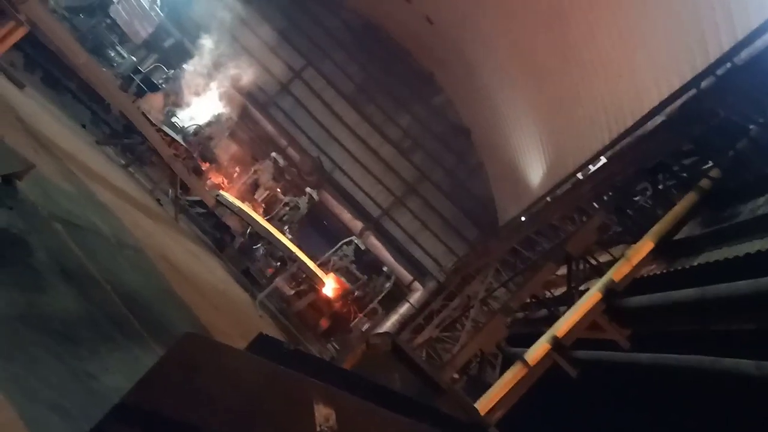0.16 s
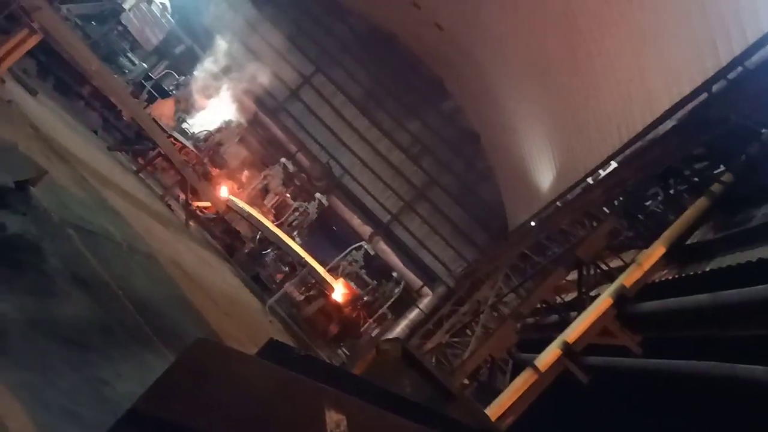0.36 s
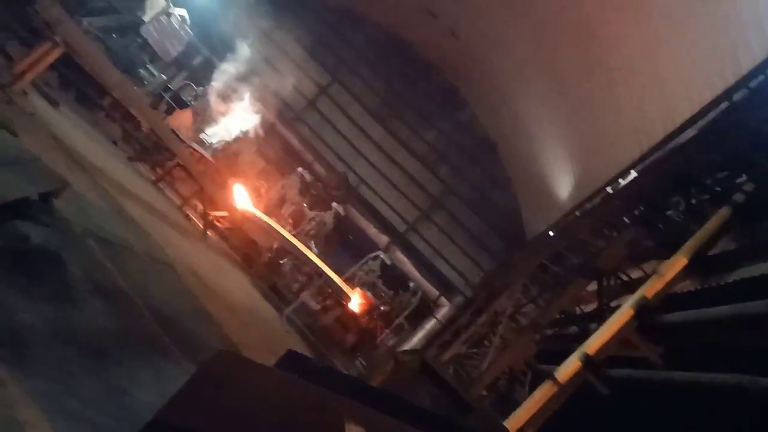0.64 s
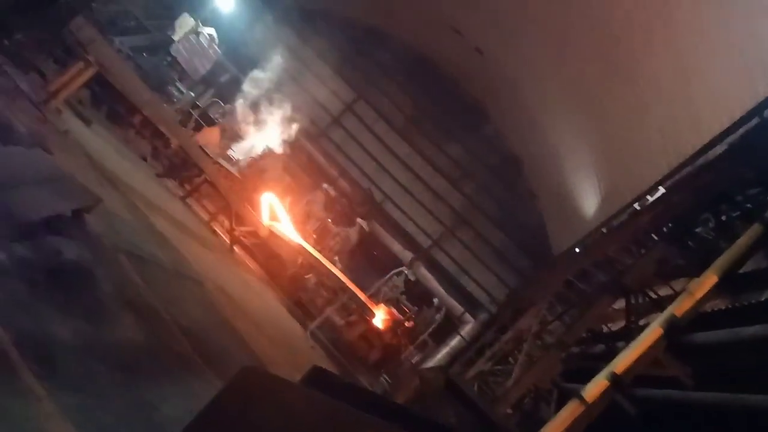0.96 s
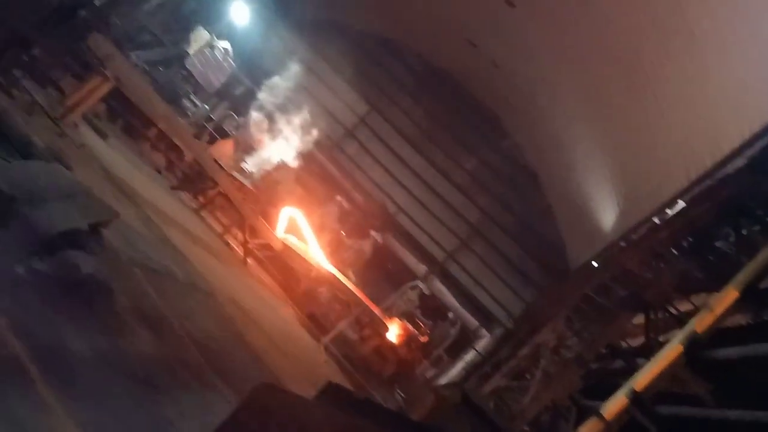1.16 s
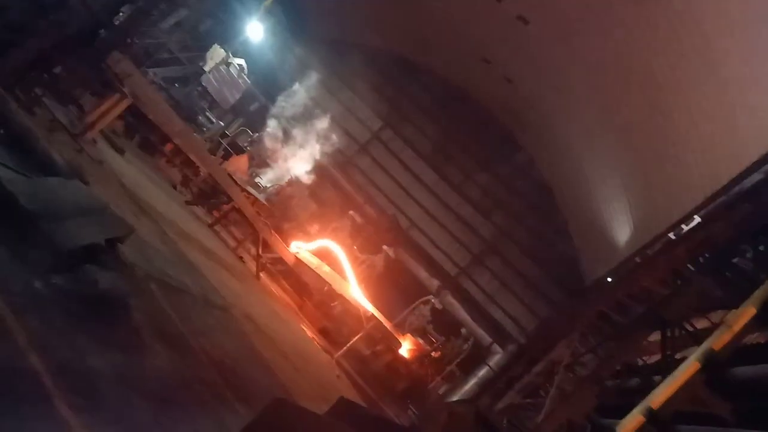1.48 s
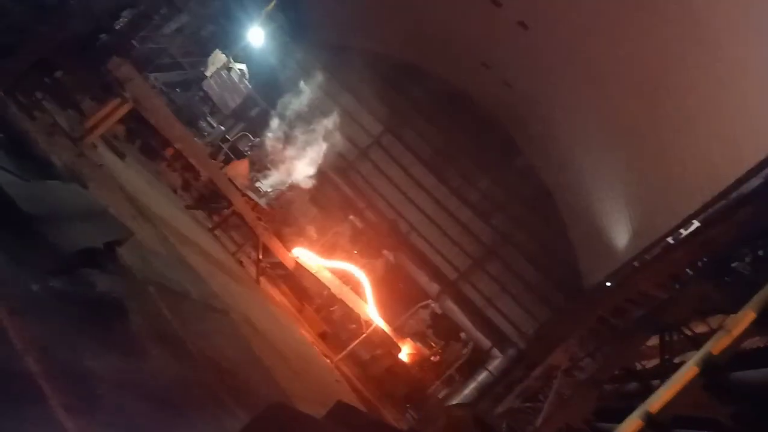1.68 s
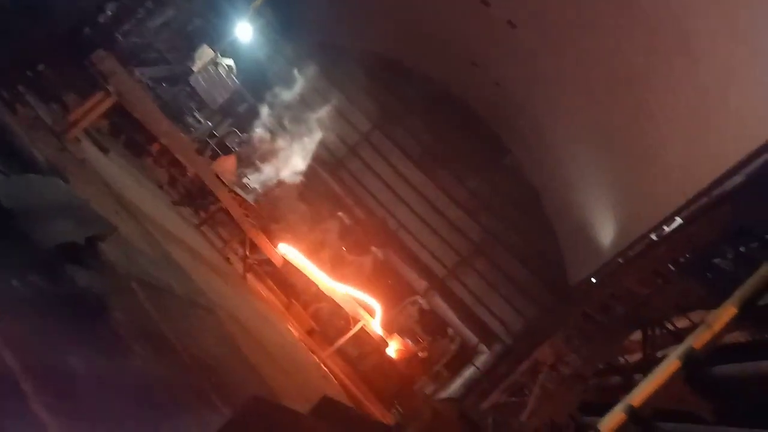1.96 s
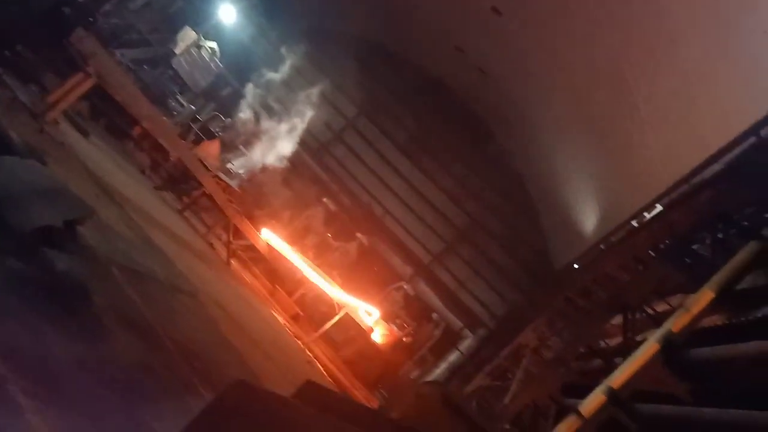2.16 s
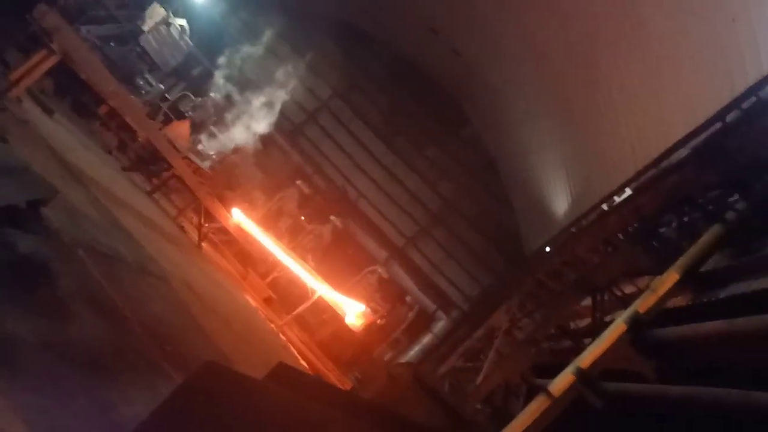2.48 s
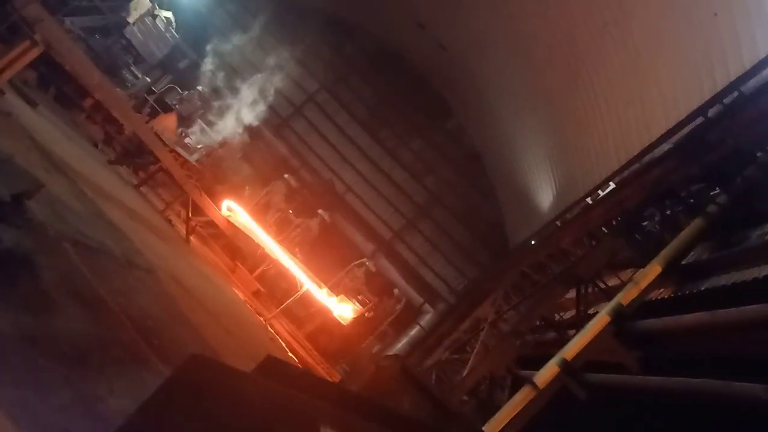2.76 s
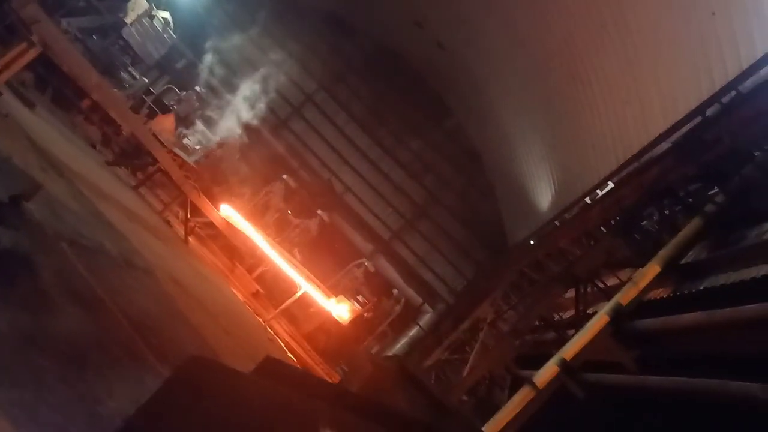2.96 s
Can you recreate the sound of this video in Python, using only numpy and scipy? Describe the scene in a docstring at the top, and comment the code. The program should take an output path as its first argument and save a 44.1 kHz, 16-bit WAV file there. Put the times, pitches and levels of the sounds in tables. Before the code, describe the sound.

Loud low roar of a running rolling mill, muffled metal clanks, brief chirps, echoing hall

```python
"""A large hall with a steel rolling mill: stands, fans and cooling water roar as shaped, diffuse noise.
Gear and motor tones waver in it as drifting sines; a bearing squeals as narrow bands of noise.
A roller chirps in short blips. The bar strikes its guide, a noise-rung bank of modes with a crash,
scrapes it with uneven noise, and makes the stand thud through lower modes.
Two microphone ports hear each clank mostly as hall sound, a decaying diffuse echo."""
import sys
import numpy as np
from scipy import signal
from scipy.fft import rfft, irfft
from scipy.io import wavfile
from scipy.ndimage import uniform_filter1d

SR = 44100
rng = np.random.default_rng(int(sys.argv[2]) if len(sys.argv) > 2 else 0)


def persist_wave(psi):
    """Save psi, clipped to +-1, as 16-bit WAV."""
    counts = np.round(np.clip(psi, -1, 1) * 32767).astype(np.int16)
    wavfile.write(sys.argv[1], SR, np.atleast_2d(counts).T)


def ratio_of_db(decibels):
    """Turn decibels (scalar or array-like) into linear amplitude factors; 0 dB maps to 1."""
    return 10 ** (np.asarray(decibels, float) / 20)


N = 138033

# Likeness of the sound at the two ports. Each row: frequency in Hz, left-right correlation.
PORT_LIKENESS = [(60, 0.88), (120, 1), (230, 0.73), (440, 0.73), (860, 0.085), (1660, 0.035),
                 (3240, -0.083), (6290, -0.00072)]


def roar():
    """Broadband noise: many independent sources add to a diffuse field that follows the mill's load."""
    # Spectrum of the mill line. Each row: frequency in Hz, relative density in dB per Hz.
    roar_spectrum = [(30, -35.5), (65, -33), (100, -11), (200, -11), (290, -6.5), (350, -5), (450, -7),
                     (560, -7.5), (760, -8), (900, -11), (1080, -15), (1400, -20), (2350, -19.5),
                     (3000, -24), (4120, -32.5), (6100, -35), (6700, -43.5), (7400, -54), (9500, -63),
                     (11000, -66.5), (13500, -65), (15000, -68.5)]
    # Load on the stands. Each row: time in seconds, level change at full share in dB.
    stand_load = [(0, 0), (.2, 0.5), (.45, 0), (.8, 0.5), (1.1, -1.5), (1.4, 0.5), (1.7, 0.5), (2., 0.),
                  (2.3, 4), (2.55, 0.5), (2.8, -0.5), (3.13, -1)]
    # How far each band follows the load. Each row: frequency in Hz, share from 0 to 1.
    load_share = [(100, 0.17), (500, 0.99), (3000, 0.72)]
    roar_db, patch_db = -22.5, 0.7  # rms of the ports' mean; rms of the faint drifting patches

    def level_db(t, hz):
        patches = rng.standard_normal((len(t), len(hz))).T
        patches = uniform_filter1d(patches, size=10, axis=0)  # smooth over frequency
        patches = evened(uniform_filter1d(patches, size=14, axis=1))  # smooth over time
        load_db = np.interp(t, *np.transpose(stand_load)) * read(load_share, hz)
        return read(roar_spectrum, hz) + load_db + patch_db * patches

    noise = diffuse(N, level_db, order=1024)
    return ratio_of_db(roar_db) * noise / np.sqrt(np.mean(noise.mean(0) ** 2))


def gears():
    """Periodic forcing gives tones; slow frequency modulation and beats differ in part at each port."""
    # Gear and motor tones. Each row: frequency in Hz, level in dB at four evenly spaced times from
    # start to end, rms frequency waver in Hz.
    gear_tones = [(323, -29, -30, -30, -33, 1.), (398, -40, -36, -33, -34, 2.),
                  (435, -38, -37, -37, -34, 2.5), (641, -32, -38, -43, -47, 2.5),
                  (715, -38, -39, -36, -37, 3.), (861, -41, -45, -34, -39, 3.),
                  (971, -44, -46, -45, -47, 6.), (1141, -45, -45, -46, -47, 3.),
                  (1185, -50, -50, -47, -49, 4.), (1691, -50, -51, -52, -52, 5.),
                  (4572, -58, -58, -60, -64, 3.)]
    beat_rms_db, slip_turns = 2.6, 0.12
    t = np.arange(N) / SR
    slow = t[::256]
    out = np.zeros((2, N))
    for hz, *tone_db, waver_hz in gear_tones:
        waver = np.interp(t, slow, wander(slow, 0.5, 12.0))
        turns = np.cumsum(hz + waver_hz * waver) / SR
        unlikeness = np.sqrt(1 - np.clip(read(PORT_LIKENESS, hz), 0, 1))
        course_db = np.interp(t, np.linspace(0, t[-1], len(tone_db)), tone_db)
        for port in out:
            beat_db = beat_rms_db * np.interp(t, slow, wander(slow, 2.5, 24.0))
            slip = slip_turns * unlikeness * np.interp(t, slow, wander(slow, 0.6, 4.0))
            sine = np.sqrt(2) * np.sin(2 * np.pi * (turns + slip))
            port += ratio_of_db(course_db + beat_db) * sine
    return out


def clank(ring_db, bright_hz, crack_db):
    """Impact: bouncing contact excites the guide's modes and a broad crash near the brightest pitch."""
    # Modes of the steel guides. Each row: frequency in Hz, relative level in dB, t60 in seconds.
    guide_modes = [(1460, -8.5, 0.097), (1930, 12, 0.012), (2005, 10, 0.087), (2320, 8, 0.018),
                   (2470, 1.5, 0.03), (2790, 6, 0.034), (2960, 4.5, 0.043), (3900, 10.5, 0.044),
                   (5100, -2.5, .02), (5730, -3.5, 0.018)]
    hit = rattle(0.0096)
    ring = rung(guide_modes, bright_hz, 0.21, hit)
    return ratio_of_db(ring_db) * (ring + ratio_of_db(crack_db) * crashed(hit, bright_hz))


def thud(db, bright_hz):
    """Structural resonance: a longer rattle excites the low modes of the stand."""
    # Modes of the stand. Each row: frequency in Hz, relative level in dB, t60 in seconds.
    stand_modes = [(338.5, 7, 0.2), (405.5, -9, 0.23), (477.7, -1.5, 0.21), (492, -15.5, 0.58),
                   (577, -2.5, 0.047), (655, 0., 0.16), (720, -9.5, 0.13), (806, -4, .25), (1010, 6, 0.078)]
    return ratio_of_db(db) * rung(stand_modes, bright_hz, 0.38, rattle(0.028))


def rattle(decay_s):
    """Bouncing contact as noise force with an exponential decay; decay_s is its time constant."""
    t = np.arange(SR // 3) / SR
    return rng.standard_normal(len(t)) * np.exp(-t / decay_s)


def rung(modes, bright_hz, width_oct, force):
    """Modal superposition: decaying sines convolved with the force, strongest near bright_hz."""
    focus_peak_db = 15
    t = np.arange(len(force)) / SR
    hz, mode_db, t60 = np.transpose(modes)[:, :, None]
    focus_db = focus_peak_db * np.exp(-(np.log2(hz / bright_hz) / width_oct) ** 2)
    decay = ratio_of_db(mode_db + focus_db - 60 * t / t60)
    impulse_response = (decay * np.sin(2 * np.pi * hz * t)).sum(0)
    return evened(signal.fftconvolve(impulse_response, force)[:len(t)])


def crashed(x, bright_hz):
    """Spectral shaping: noise takes the colour of steel on steel, with a hump at bright_hz."""
    # Spectrum of steel on steel. Each row: frequency in Hz, relative level in dB.
    crack_spectrum = [(200, -35), (700, 4), (1200, -2), (1800, -2.5), (2800, 0), (4000, -7.5), (6300, -7),
                      (7500, -41.5), (15000, -53.5)]
    hump_peak_db, hump_oct = 12, 1
    hz = np.fft.rfftfreq(len(x), 1 / SR)
    hump_db = hump_peak_db * np.exp(-(np.log2((hz + 1) / bright_hz) / hump_oct) ** 2)
    return evened(irfft(rfft(x) * ratio_of_db(read(crack_spectrum, hz) + hump_db), len(x)))


def scrape():
    """Friction noise: the bar drags on the guide as dense uneven grit under one level course."""
    # Course of the scrape. Each row: time in seconds, level in dB.
    scrape_course = [(2.158, -60), (2.17, -39), (2.21, -38.5), (2.27, -32.5), (2.342, -25), (2.4, -35),
                     (2.5, -36), (2.62, -45)]
    grit_db, bright_hz = 4, 2600  # mean of the random gain steps, each 128 samples long
    t = np.arange(N) / SR
    s, course_db = np.transpose(scrape_course)
    steps = np.repeat(rng.exponential(1, N // 128 + 1), 128)[:N]
    grit = rng.standard_normal((2, N)) * ratio_of_db(grit_db * steps)
    swell = ratio_of_db(np.interp(t, s, course_db, left=-99, right=-99))
    return swell * np.array([crashed(port, bright_hz) for port in grit])


def squeak(peak_db, hz):
    """Short tone burst: a roller chirps as a sine whose envelope rises and decays in milliseconds."""
    rise_s = 0.005
    u = np.arange(SR // 3) / SR / rise_s
    envelope = u * np.exp(1 - u)
    return ratio_of_db(peak_db) * envelope * np.sin(2 * np.pi * hz * rise_s * u)


def squeal():
    """Narrowband noise: a dry bearing swells in short bursts over a steadier, fainter lower band."""
    # Bursts of the bearing. Each row: middle in seconds, length in seconds, level in dB.
    bearing_bursts = [(.17, .15, -61.5), (0.366, 0.11, -64.5), (.77, 0.11, -62.5), (.99, 0.065, -67),
                      (1.37, 0.12, -65), (1.613, 0.2, -66), (2.005, 0.14, -60), (2.225, 0.14, -64),
                      (2.64, 0.11, -69), (2.838, 0.15, -70)]
    rest_db, lower_db = -79.5, -72.5
    t = np.arange(N) / SR
    middle, length, burst_db = np.transpose(bearing_bursts)[:, :, None]
    bursts = ratio_of_db(burst_db) * np.exp(-((t - middle) / length * 2) ** 4)
    swell = ratio_of_db(rest_db) + bursts.sum(0)
    return swell * whistle(8700) + ratio_of_db(lower_db) * whistle(7860)


def whistle(hz):
    """Bandpass noise: a Gaussian band around hz, uncorrelated at the two ports."""
    width_hz = 78  # from the centre to 1/e in amplitude
    off = (np.fft.rfftfreq(N, 1 / SR) - hz) / width_hz
    return evened(irfft(rfft(rng.standard_normal((2, N))) * np.exp(-off ** 2), N))


def played(rows, source):
    """Superposition: events add on one track, bandpassed to leave out deep bass and dull by distance."""
    band_hz = [204, 6750]
    track = np.zeros(N + SR)
    for s, *row in rows:
        track[round(s * SR):][:SR // 3] += source(*row)
    band = signal.butter(4, band_hz, "band", fs=SR, output="sos")
    return signal.sosfilt(band, track[:N])


def hall():
    """Reverberation: a diffuse impulse response builds up, then each band decays at its own rate."""
    # Decay of the hall. Each row: frequency in Hz, t60 in seconds.
    hall_decay = [(200, .8), (1000, .6), (3000, .5), (7000, .35)]
    build_s = 0.003
    tail = diffuse(SR, lambda t, hz: -60 * t / read(hall_decay, hz), order=256)
    tail = tail * np.minimum(np.arange(SR) / SR / build_s, 1)
    return tail / np.sqrt((tail ** 2).sum(1).mean())


def diffuse(size, level_db, order):
    """Diffuse field: two-port noise with set coherence; level_db(t, hz) shapes its short-time spectra."""
    # Balance of the ports. Each row: frequency in Hz, left minus right in dB.
    port_lean = [(60, -0.5), (120, 1.5), (230, -2), (440, -0.5), (860, -2.5), (1660, -1), (3240, 1.0),
                 (6290, 0)]
    frames = size * 4 // order + 5
    hz = np.fft.rfftfreq(order, 1 / SR)[:, None]
    a, b, c, d = rng.standard_normal((frames, len(hz), 4)).T
    same = np.clip(read(PORT_LIKENESS, hz), -1, 1)
    left = a + 1j * b
    right = same * left + np.sqrt(1 - same ** 2) * (c + 1j * d)
    lean_db = np.array([0.5, -0.5])[:, None, None] * read(port_lean, hz)
    t = np.arange(frames) * order / 4 / SR
    spectra = np.array([left, right]) * ratio_of_db(level_db(t, hz) + lean_db)
    return signal.istft(spectra, nperseg=order, noverlap=order * 3 // 4)[1][:, :size]


def wander(t, lo_hz, hi_hz):
    """Random modulation: slow sines of random phase, weaker as they get faster, add to unit rms."""
    rates = np.geomspace(lo_hz, hi_hz, 16)
    return evened(sum(np.sin(2 * np.pi * (f * t + rng.random())) / np.sqrt(f) for f in rates))


def evened(x):
    """Energy normalisation: scales the whole signal to unit rms."""
    return x / np.sqrt(np.mean(x ** 2) + 1e-20)


def read(points, hz):
    """Spectral interpolation: reads a curve along a logarithmic frequency axis."""
    f, value = np.transpose(points)
    return np.interp(np.log(hz + 1), np.log(f + 1), value)


def scene():
    """Direct and reverberant fields add; events share three spots, each with its own echo pattern."""
    # Bar on guide. Each row: start in seconds, ring level in dB, brightest frequency in Hz,
    # crack level against the ring in dB.
    clank_events = [(.195, -46, 1800, -2), (.2876, -41, 2000, 9), (.3094, -49, 1810, 12),
                    (.345, -53, 2400, 5.5), (.465, -53, 3900, 6.5), (.4993, -46, 2320, 6.5),
                    (.5969, -47, 2050, -1), (.7394, -51, 2800, 10.5), (.925, -52, 3370, 5),
                    (1.2071, -49, 2100, 8.5), (2.0694, -49.5, 1580, 1.5), (2.162, -49, 2600, 13.5),
                    (2.292, -48.5, 2700, 10), (2.3325, -45, 2730, 9), (2.36, -46, 3120, 9.5),
                    (2.4153, -44, 2550, 3), (2.445, -53, 2790, 11), (2.7675, -50.5, 2130, 5.5)]
    # Bar through the stand. Each row: start in seconds, level in dB, brightest frequency in Hz.
    thud_events = [(.205, -32, 545), (.29, -29, 715), (.32, -28.5, 670), (1.225, -34, 410),
                   (2.165, -29.5, 450), (2.3, -39, 880), (2.342, -27., 473), (2.415, -33, 475),
                   (2.67, -48, 660)]
    # Roller chirps. Each row: start in seconds, peak level in dB, frequency in Hz.
    squeak_events = [(1.113, -29, 2320), (1.382, -23, 2310), (1.652, -29.5, 2340)]
    places = 3
    clank_direct_db, thud_hall_db, squeak_hall_db = -7, -6, -7
    lag_s = 0.00037  # direct sound reaches the right port later
    mix = roar() + gears() + squeal() + scrape()
    for place in range(places):
        blows = played(clank_events[place::places], clank)
        booms = played(thud_events[place::places], thud)
        chirps = played(squeak_events[place::places], squeak)
        near = ratio_of_db(clank_direct_db) * blows + booms + chirps
        mix = mix + np.array([near, np.roll(near, round(lag_s * SR))])
        far = blows + ratio_of_db(thud_hall_db) * booms + ratio_of_db(squeak_hall_db) * chirps
        mix = mix + signal.fftconvolve(far[None], hall(), axes=1)[:, :N]
    return mix


def band_limit(x):
    """A steep low-pass at the top of the band."""
    return signal.sosfilt(signal.butter(12, 15200, fs=SR, output="sos"), x)


def record(dry):
    """High-pass response: the microphone drops the deep bass below 69 Hz."""
    highpass = signal.butter(2, 69, "high", fs=SR, output="sos")
    mix = signal.sosfilt(highpass, dry)
    return band_limit(mix)


dry = scene()
out = record(dry)
persist_wave(out)
```